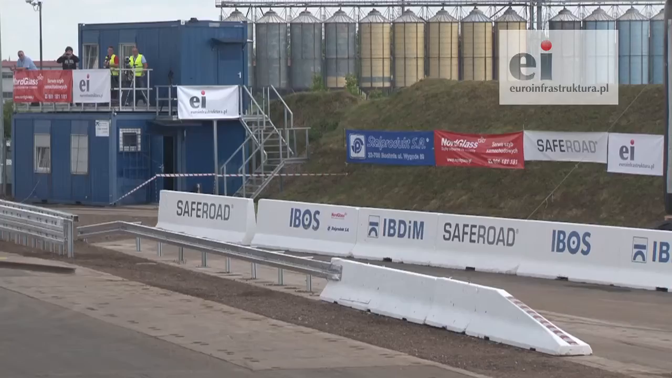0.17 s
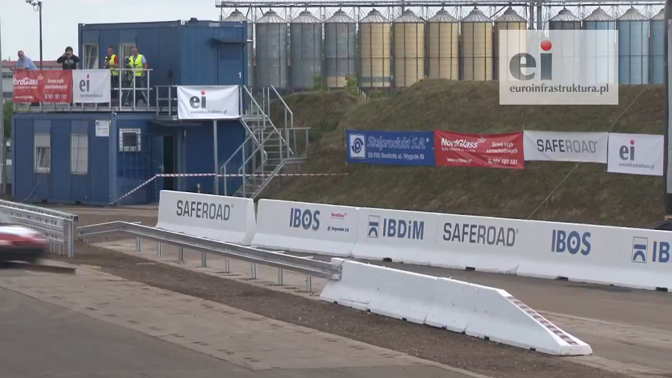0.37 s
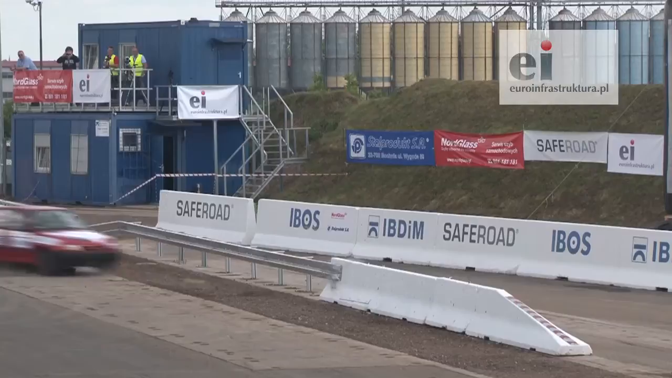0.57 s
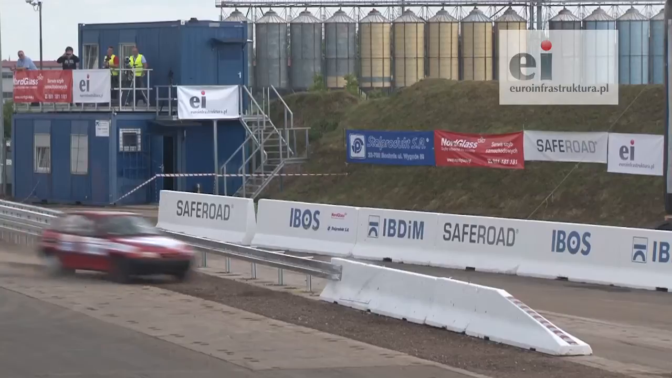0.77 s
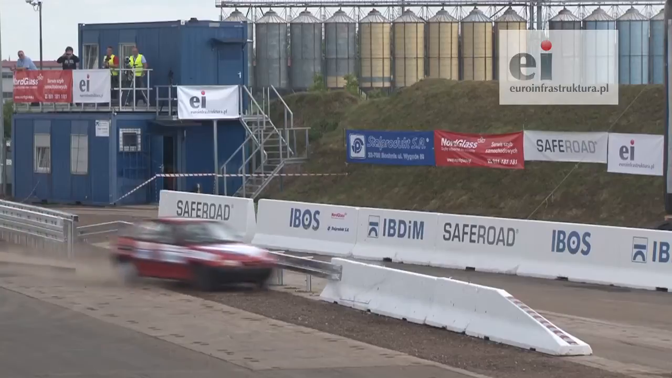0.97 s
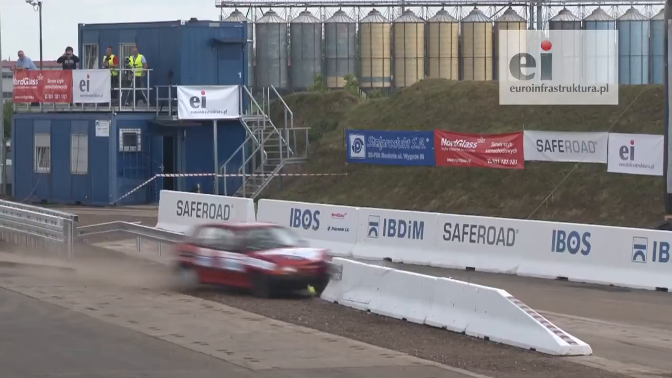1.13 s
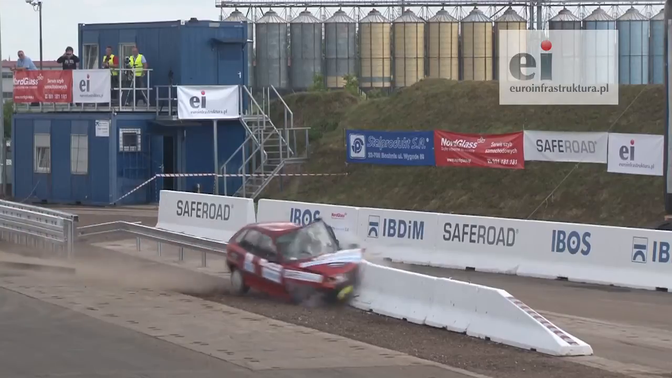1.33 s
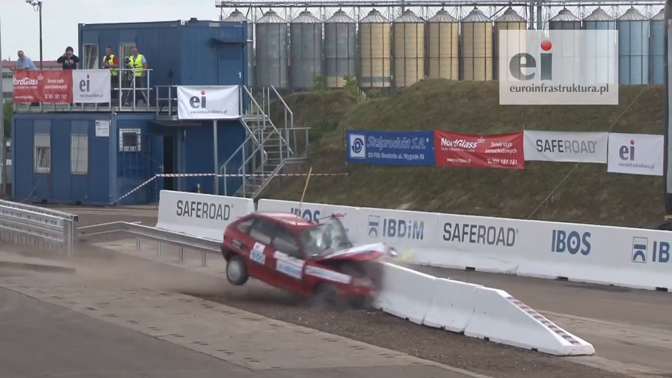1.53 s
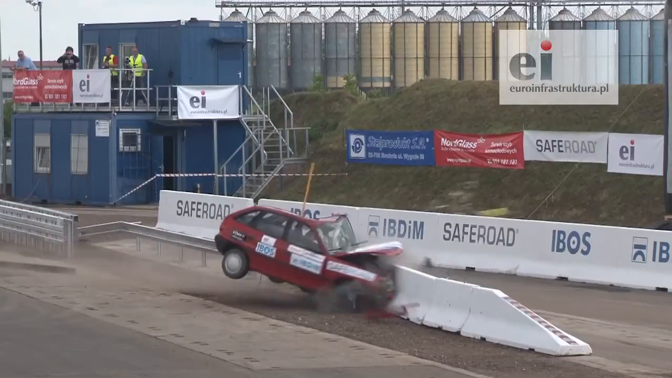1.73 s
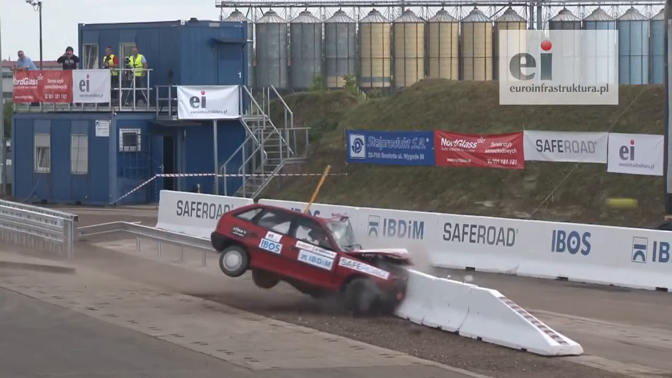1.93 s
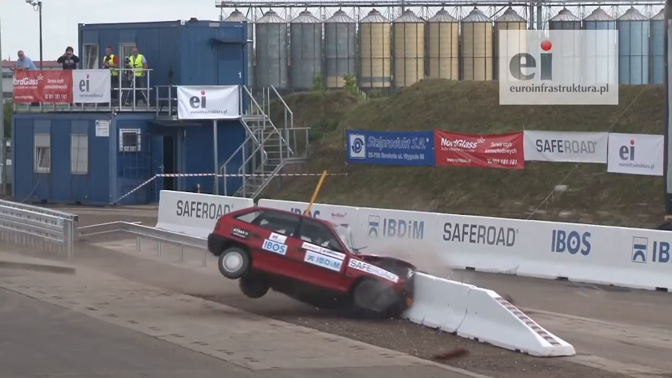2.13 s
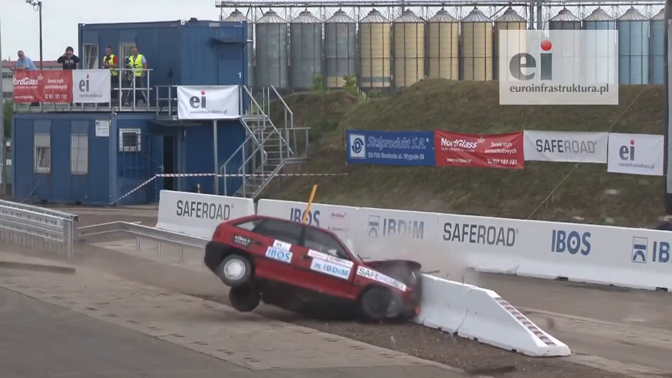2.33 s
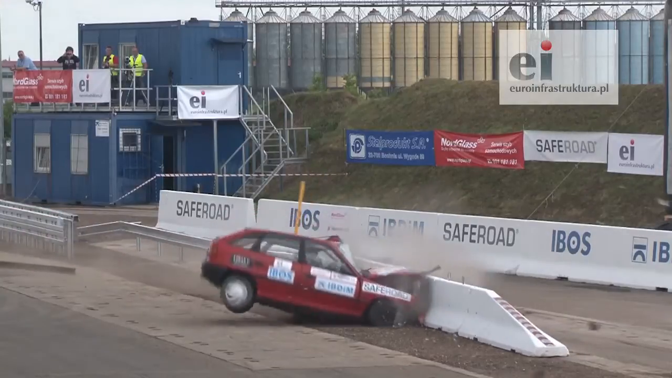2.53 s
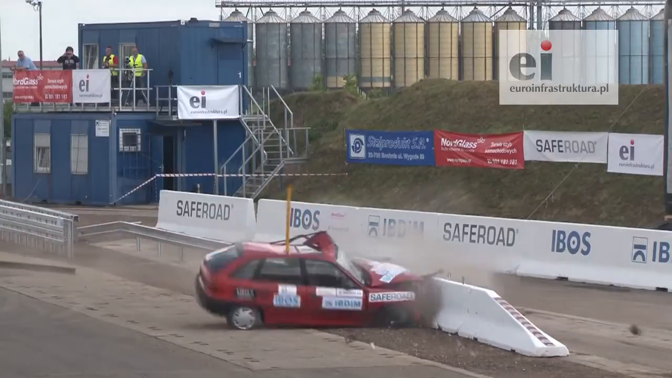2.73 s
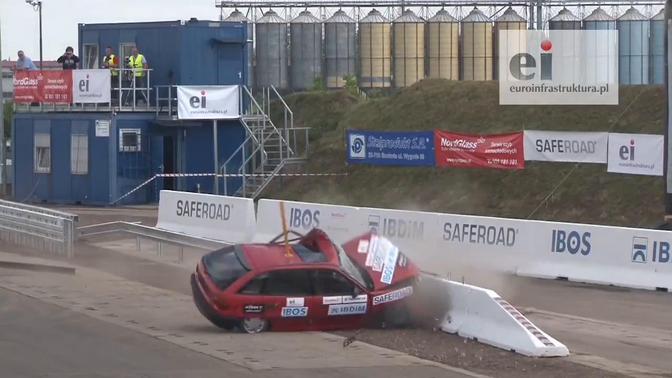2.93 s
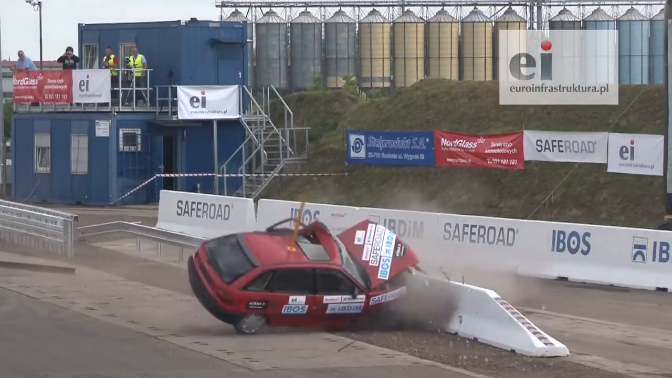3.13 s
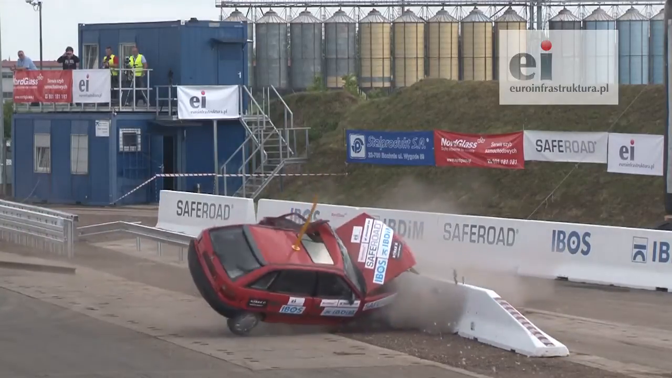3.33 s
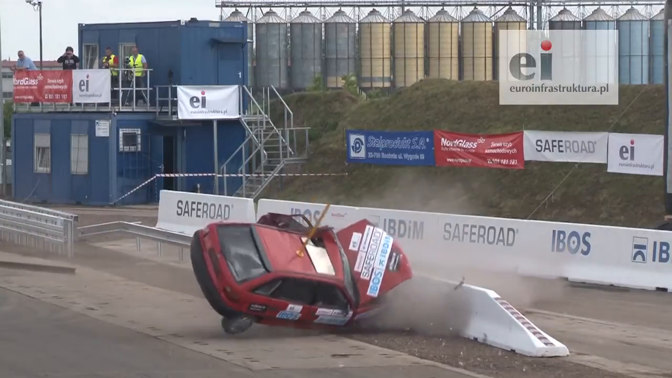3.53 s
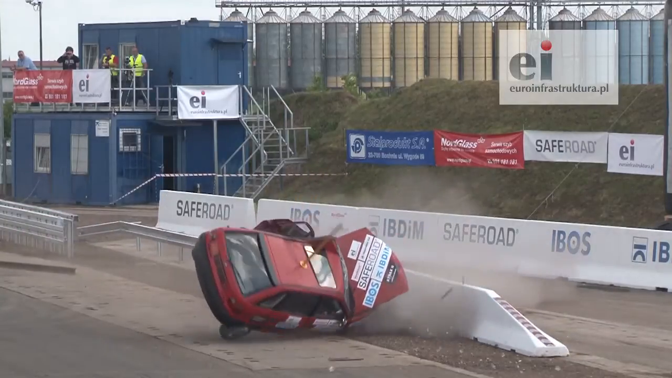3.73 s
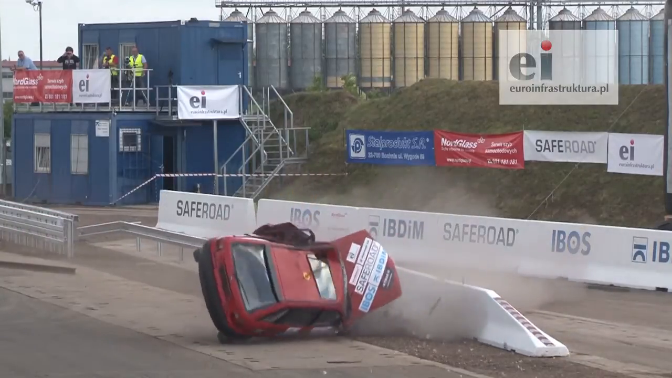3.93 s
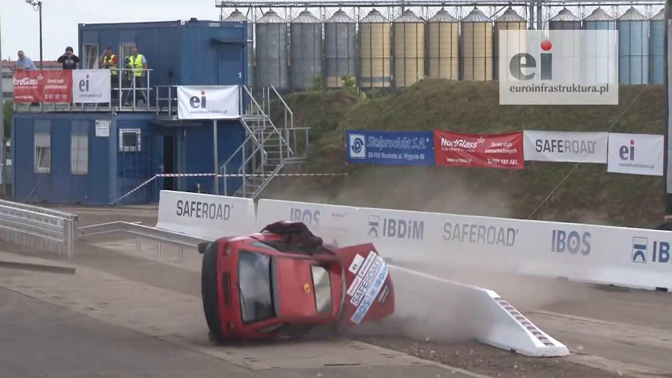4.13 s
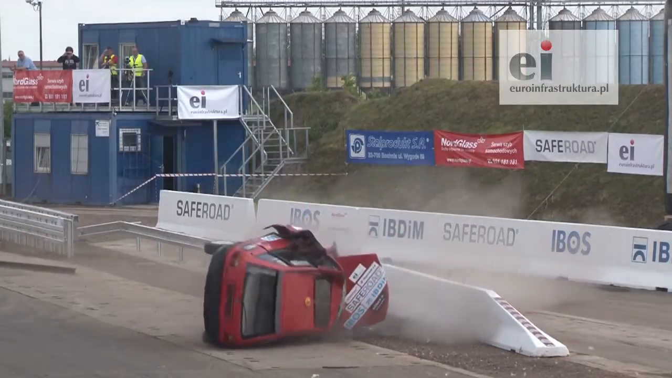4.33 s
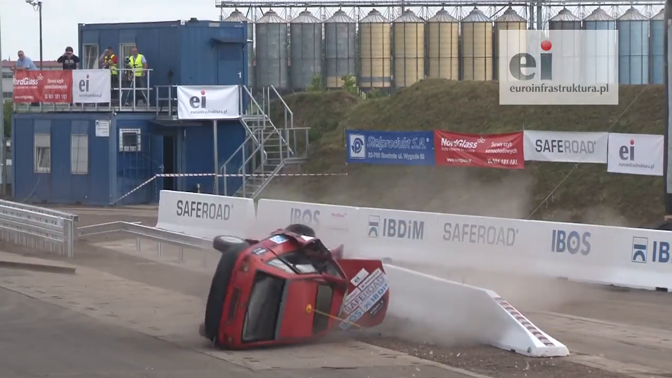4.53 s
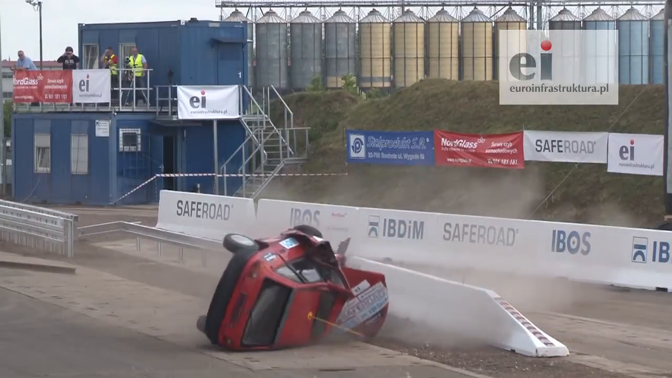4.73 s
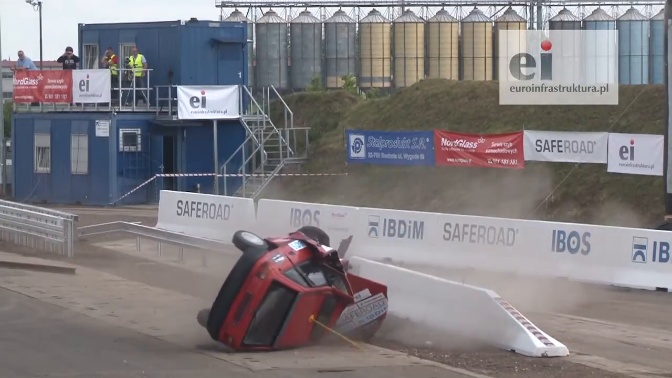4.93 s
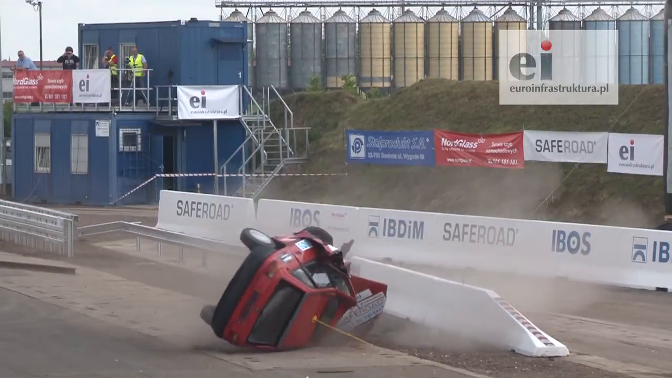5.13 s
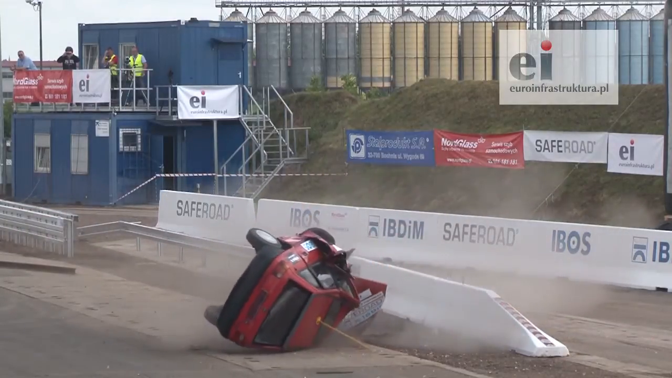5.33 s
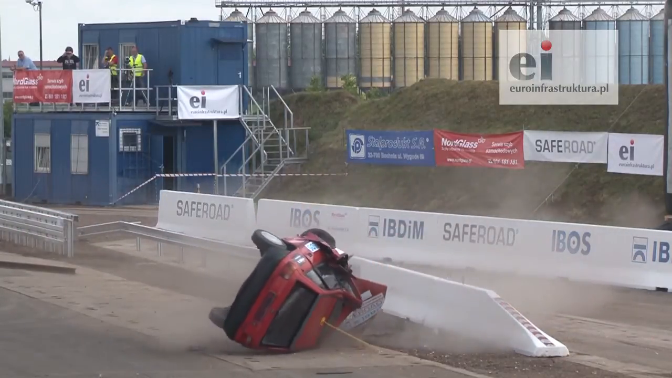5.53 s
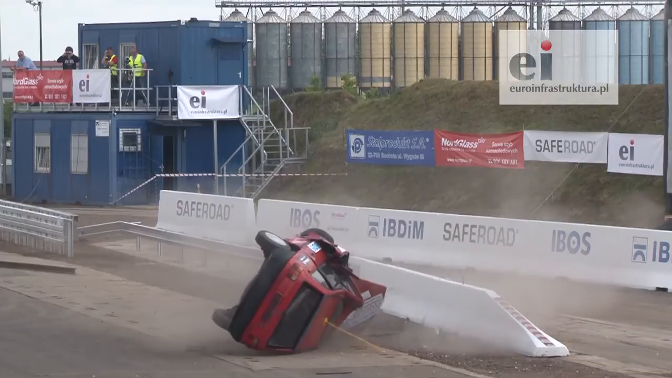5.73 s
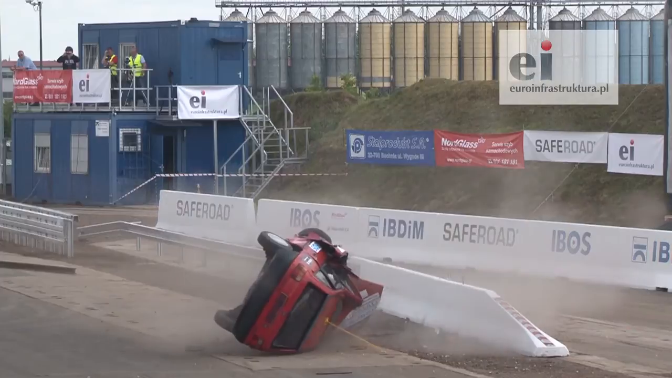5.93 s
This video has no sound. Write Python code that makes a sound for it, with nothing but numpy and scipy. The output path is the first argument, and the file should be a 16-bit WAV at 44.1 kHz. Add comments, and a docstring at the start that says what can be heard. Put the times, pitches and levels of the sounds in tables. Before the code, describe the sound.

After brief silence, gritty tyre roar, a grinding steel rail, then a violent crunching crash, followed by falling debris, folding metal and scattered knocks outdoors.

```python
"""Outdoors, one small microphone some way off: an airy background hiss as tyres roar on a gritty track.
The car's side then grinds on a steel guard rail, rubbed by stick and slip, whose notes hum on.
It slams into a concrete barrier: jagged contacts drive panels, trim and glass, and the frame booms.
Grit and splinters fall as random clicks, pieces knock on the ground; thin squeaks and rings are sines.
The wreck drops and tips on its side, folding and snapping; the hiss swells and a low drone joins it late."""
import sys
import numpy as np
from scipy import signal
from scipy.fft import rfft, irfft
from scipy.io import wavfile

SR = 44100
rng = np.random.default_rng(int(sys.argv[2]) if len(sys.argv) > 2 else 0)


def wrap_up_sound(samples):
    """Save the sound to the file named by the first command line argument, as 16-bit audio."""
    columns = np.atleast_2d(samples).T
    # keep every value between -1 and 1, then stretch to whole-number steps
    tamed = np.clip(columns, -1, 1)
    steps = np.round(tamed * 32767).astype(np.int16)
    wavfile.write(sys.argv[1], SR, steps)


N = 263820
TIME = np.arange(N) / SR   # seconds

# Levels of resonances and spectra are relative within each table.
# airy background hiss, swelling slowly towards the end: (time [s], level [dB])
HISS_LEVEL = [(2.0, -55), (3.2, -52), (4.25, -54), (4.72, -51.5), (4.92, -53.5), (5.55, -49.8),
              (5.98, -50.6)]
# its spectrum: (frequency [Hz], level [dB])
HISS_COLOUR = [(30, -32), (65, -14.5), (130, -12), (200, -16.5), (400, -5.5), (650, -2.5), (1000, -5),
               (1900, -4), (2900, -2.5), (3500, -6.5), (6300, -15.5), (8000, -25), (10000, -34),
               (16000, -72)]
# a low drone comes up late and stays
DRONE_DB, DRONE_FROM_S, DRONE_RISE_DB_PER_S = -77, 4.8, 35

# spectrum of tyres on the track: (frequency [Hz], level [dB])
ROLL_COLOUR = [(24, -29), (40, -26), (122, -10), (177, -22.5), (211, -9.5), (412, -6), (478, -10),
               (582, -1), (1080, -5), (1610, -2), (2060, -9), (2580, -3.5), (3560, -9.5), (6780, -23),
               (15000, -59)]
# tyres roar until the car is stopped
ROLL_DB, ROLL_UNTIL_S, ROLL_FALL_DB_PER_S = -41.2, 1.21, 60

# spectrum of grit and glass: (frequency [Hz], level [dB])
GRIT_COLOUR = [(1500, -30), (3000, 1), (4200, 0.5), (5500, 3), (7000, 4.5), (8300, -2), (9500, 0),
               (10600, -7.5), (12500, -30.5), (16000, -37)]
# grit stirred up by the tyres and by the scraping side, relative to their levels
TYRE_GRIT_DB, SCRAPE_GRIT_DB = -16.5, -14.5
# glass and grit thrown out by the crash:
# (time [s], level [dB], rise [s per 10 dB], fall [s per 10 dB])
SPRAYS = [(1.3, -43, .075, .12), (1.58, -49.5, .15, .45), (2.62, -56, .1, .05), (2.845, -49, .055, .065),
          (3.41, -51, .27, .22), (4.72, -65.5, .25, .2)]
GLASS_BREAKS_S = 1.225
# thrown-up grit keeps coming down, then thins out
SETTLE_FROM_S, SETTLE_UNTIL_S, SETTLE_RISE_DB_PER_S, SETTLE_FALL_DB_PER_S = 1.45, 4.8, 55, 14
PATTER_DB, TRICKLE_DB = -66.7, -63.3

# thin high squeaks and ringing notes: (time [s], frequency [Hz], level [dB], time to fall by 60 dB [s])
THIN_NOTES = [(.38, 8640, -44, .15), (1.49, 8300, -44, .16), (1.561, 7340, -43, .13),
              (2.62, 10970, -33, .038), (2.63, 10500, -43, .052), (2.81, 2250, -35.5, .16),
              (2.92, 10200, -45, .12), (3.045, 6950, -51, .15), (3.07, 7800, -53, .17),
              (3.634, 5430, -56, .18), (3.66, 5410, -42, .15), (4.285, 4350, -48.5, .47),
              (4.28, 7560, -48.5, .16)]

# what the rail sings with when rubbed: (frequency [Hz], width [Hz], level [dB])
RAIL_MODES = [(560, 320, -3), (834, 130, 2), (1118, 105, 4.5), (1530, 110, -23), (2460, 240, -27),
              (3030, 430, -2.5), (4150, 410, -9), (5450, 1500, -20), (6430, 1100, -15)]
# long bending notes of the struck rail: (frequency [Hz], level [dB])
RAIL_NOTES = [(183, -73.5), (231.5, -67.5), (387.6, -68.5)]
# the rail swings while the car leans on it, then dies away
SWING_FROM_S, SWING_UNTIL_S, SWING_RISE_DB_PER_S, SWING_FALL_DB_PER_S = .7, 3.08, 15, 48
# the car's side grinds along the rail from first touch to the barrier
SCRAPE_DB, SCRAPE_FROM_S, SCRAPE_UNTIL_S, SCRAPE_EDGE_DB_PER_S = -41.7, .78, 1.23, 500
# the car catching on rail joints: (time [s], length [s], level [dB])
CATCHES = [(0.826, 0.024, -32.3), (0.951, 0.019, -38), (1.061, .006, -32.3), (1.099, 0.013, -41.5)]
# screech of a joint: (frequency [Hz], width [Hz], level [dB])
JOINT_MODES = [(2590, 260, -2), (3100, 260, 3), (3940, 340, -2), (5340, 1140, -13.5), (6660, 1040, -14.5)]
# the side presses harder after a catch: level relative to it, lag, time to rise and to fall by 10 dB
PRESS_DB, PRESS_LAG_S, PRESS_RISE_S, PRESS_FALL_S = -4.8, .042, .035, .12
FULL_CATCH_S = .024   # shorter catches pass on less energy

# heavy blows, each a short run of buckles:
# (time [s], length [s], level of the trim [dB], hardness [dB]: more glass and less panel)
BLOWS = [(1.223, .0076, -30, 2), (1.254, .018, -39, 2.5), (1.281, .0057, -33, -3),
         (1.301, .0095, -36, -7.5), (1.315, .011, -41.5, -12), (1.333, .0075, -36, -3),
         (1.352, .014, -43.5, 2.5), (1.381, .027, -47, -5), (1.868, .011, -49.5, -7),
         (2.097, .008, -49, -8), (2.109, .011, -42, -8), (2.124, .02, -50, -9), (2.502, .011, -54, -10),
         (2.732, .02, -53, -10.5), (2.768, .012, -45.5, -5), (2.806, .011, -41, -2),
         (2.832, .0059, -37.5, 0), (2.852, .043, -51, 0), (3.395, .035, -59, 0), (3.719, .005, -51, 4),
         (3.95, .022, -52, 0)]
BLOW_PANEL_DB, BLOW_CHIP_DB = -3.5, -4.5   # relative to the trim, before hardness
# brittle trim giving way under the wreck's weight: (time [s], length [s], level [dB])
SNAPS = [(2.198, .0026, -36.5), (2.21, .006, -44.5), (4.476, .003, -43.3), (5.146, .064, -51),
         (5.209, .0072, -43), (5.541, .01, -48.5)]
SNAP_PANEL_DB, SNAP_CHIP_DB = -11, -15   # relative to the trim
# sheet steel of the body: (frequency [Hz], width [Hz], level [dB])
PANEL_MODES = [(216, 90, -12.5), (412, 170, -5), (581, 140, 2), (720, 53, 3.5), (810, 76, 2.5),
               (984, 310, -1.5), (1330, 160, -5)]
# snapping trim and brackets: (frequency [Hz], width [Hz], level [dB])
CRACK_MODES = [(1560, 270, -3), (2290, 233, 4.5), (2524, 310, 2), (3086, 270, 0.5), (3860, 390, -2.5)]
# shattering glass and chips: (frequency [Hz], width [Hz], level [dB])
CHIP_MODES = [(3970, 540, -5), (5830, 2100, 3), (6430, 1670, 4), (7120, 300, 2), (8300, 420, -5.5),
              (9900, 1200, -11), (13500, 3000, -61)]

# spectrum of folding sheet metal: (frequency [Hz], level [dB])
PANEL_COLOUR = [(40, -30), (90, -21), (160, -8.5), (330, -4.5), (500, -2), (700, 2), (1000, -1.5),
                (1400, -2), (1900, -8), (2600, -10.5), (4000, -11), (7000, -18), (10000, -25), (16000, -47)]
# the shell folds under the car's weight, at the impact and at each landing:
# (time [s], level [dB], rise [s per 10 dB], fall [s per 10 dB])
FOLDS = [(1.245, -36.7, .014, .19), (1.9, -51, .07, .4), (2.57, -50.5, .12, .14), (2.83, -44.5, .15, .07),
         (3.04, -48.5, .07, .08), (3.93, -57.5, .2, .1)]
# the wreck drags along the barrier, then dies away
DRAG_DB, DRAG_FROM_S, DRAG_UNTIL_S, DRAG_RISE_DB_PER_S, DRAG_FALL_DB_PER_S = -55, 1.25, 3.2, 600, 16
# boom of the frame: (frequency [Hz], width [Hz], level [dB])
FRAME_MODES = [(89, 38, -9), (157, 61, -1), (232.8, 63, 3.5), (406, 170, 1)]
# the frame takes the load of the impact
FRAME_DB, FRAME_FROM_S, FRAME_UNTIL_S, FRAME_RISE_DB_PER_S, FRAME_FALL_DB_PER_S = -44, 1.235, 1.3, 1000, 66

# the first and thickest fall of grit: (time [s], level [dB], rise [s per 10 dB], fall [s per 10 dB])
FIRST_FALL = (1.55, -55, .17, .35)
# spectrum of the falling ticks: (frequency [Hz], level [dB])
TICK_COLOUR = [(1500, -5), (4000, 12.5), (7000, 0), (9500, 8.5), (11500, -13.5), (16000, -19)]

# single pieces knocking on the ground: (time [s], level [dB], brightness [dB]: chip over crack)
KNOCKS = [(1.755, -36.5, 1), (2.341, -39, 5), (2.451, -38, -6), (2.492, -40, 1), (2.544, -41, -12),
          (2.684, -38.5, -1), (3.288, -43, 14), (3.394, -37.5, 18), (3.4, -40.5, 17), (3.407, -36.5, 16),
          (3.428, -41.5, 18), (3.547, -41, 16), (3.765, -32.5, 3), (3.848, -39, -1), (4.0056, -32.5, 2),
          (4.042, -32.5, 6), (4.285, -43, 12), (4.413, -40.5, 0), (4.516, -42, -5), (5.17, -43.5, -9),
          (5.498, -41, 4)]

# echoes from the wall, the cabins and the bank, before dulling: (delay [s], level [dB])
ECHOES = [(.021, -19), (.058, -24.5), (.13, -25)]
# dips of the microphone housing: (frequency [Hz], width [Hz], level [dB])
HOUSING_DIPS = [(3470, 700, -7.5), (4684, 420, -4), (9570, 2670, -13.5)]
TREBLE_HZ, CUTOFF_HZ = 15000, 15800   # the microphone dulls above the first, the top is cut at the second
START_S = .304   # silent before this


def from_db(db):
    """Decibels to gain."""
    return 10 ** (np.asarray(db) / 20)


def rms_one(x):
    """Scale to an rms of 1."""
    return x / np.sqrt(np.mean(x ** 2) + 1e-20)


def low_pass(x, hz, order=2):
    """Roll off the treble above a frequency."""
    return signal.sosfilt(signal.butter(order, hz, fs=SR, output="sos"), x)


def drift(rate):
    """Smooth chance with an rms of 1, renewed rate times a second."""
    return rms_one(np.interp(TIME * rate, np.arange(4096), rng.standard_normal(4096)))


def through(x, response):
    """Pass a signal through an impulse response."""
    return signal.oaconvolve(x, response)[:N]


def peak(x, hz, width):
    """One resonance with a gain of 1 on top."""
    return signal.lfilter(*signal.iirpeak(min(hz, .45 * SR), hz / width, fs=SR), x)


def colour(points, size=4096):
    """Causal (minimum-phase) impulse response of unit energy with the given spectrum."""
    hz, db = np.transpose(points)
    grid = np.maximum(np.arange(size // 2 + 1) * SR / size, 1)
    spectrum = from_db(np.interp(np.log(grid), np.log(hz), db))
    cepstrum = irfft(np.log(spectrum))
    # folding the cepstrum forward makes the response causal
    cepstrum[1:size // 2] *= 2
    cepstrum[size // 2 + 1:] = 0
    return rms_one(irfft(np.exp(rfft(cepstrum)))) / np.sqrt(size)


def body(modes, scatter=0.0, size=4096):
    """Impulse response of damped modes, unit energy; scatter detunes them as each piece differs."""
    click = signal.unit_impulse(size) + 1e-18
    response = np.zeros(size)
    for k, (hz, width, db) in enumerate(modes):
        tuned_hz = hz * np.exp(scatter * rng.normal())
        response += (-1) ** k * from_db(db) * peak(click, tuned_hz, width)
    # little radiates far above the highest mode
    response = low_pass(response, min(2 * modes[-1][0], SR / 2.2))
    return rms_one(response) / np.sqrt(size)


def grains(per_s, spread_db):
    """Random clicks of uneven size, rms 1."""
    sizes = from_db(spread_db * np.minimum(rng.exponential(1, N), 4))
    signed = sizes * rng.choice([-1, 1], N)
    return rms_one(signed * (rng.random(N) < per_s / SR))


def add(out, s, sound):
    """Mix a sound in at time s."""
    at = int(s * SR)
    out[at:at + len(sound)] += sound[:N - at]


def held(from_s, until_s, rise_db_per_s, fall_db_per_s):
    """Gain that rises to 1, holds between two times and dies away."""
    before = rise_db_per_s * np.maximum(from_s - TIME, 0)
    after = fall_db_per_s * np.maximum(TIME - until_s, 0)
    return from_db(-np.clip(before + after, 0, 200))


def surge(s, db, rise_s, fall_s):
    """Gain that swells to a peak and fades, by 10 dB in each rise or fall time."""
    return from_db(db) * held(s, s, 10 / rise_s, 10 / fall_s)


def together(*gains):
    """Unrelated causes add in power."""
    return np.sqrt(sum(gain ** 2 for gain in gains))


def contact(length, modes, rise_s=0.00084, fade_s=0.0062, jag_db=2.8, size=8192):
    """A jagged force drives a body while the contact lasts; the sound has the energy of the force's envelope."""
    t = TIME[:size]
    force = (1 - np.exp(-t / rise_s)) * np.exp(-np.maximum(t - length, 0) / fade_s)
    buckles = force * rng.standard_normal(size) * from_db(jag_db * drift(506)[:size])
    sound = signal.fftconvolve(buckles, body(modes, scatter=0.045))
    return sound * np.linalg.norm(force) / np.linalg.norm(sound)


def background(tone_hz=1530, tone_width_hz=230, tone_db=2.5, surge_db=2.0, drone_hz=70):
    """Coloured noise as an airy hiss with a surging resonance, and a low wandering sine that comes up late."""
    air = through(rng.standard_normal(N), colour(HISS_COLOUR))
    hiss = air + from_db(tone_db + surge_db * drift(15)) * peak(air, tone_hz, tone_width_hz)
    level_db = np.interp(TIME, *np.transpose(HISS_LEVEL)) + 0.3 * drift(25)
    drone_gain = from_db(DRONE_DB) * held(DRONE_FROM_S, N / SR, DRONE_RISE_DB_PER_S, 0)
    drone = drone_gain * np.sin(2 * np.pi * drone_hz * TIME + 0.9 * drift(16))
    return hiss * from_db(level_db) + drone


def rolling():
    """Strength of the tyres: steady at speed, fading once the car is stopped."""
    return from_db(ROLL_DB) * held(0, ROLL_UNTIL_S, 0, ROLL_FALL_DB_PER_S)


def tyres():
    """Tread blocks slap the gritty track so densely that they merge into a roar."""
    slaps = grains(per_s=15000, spread_db=0.5) * from_db(0.47 * drift(41))
    return through(slaps * rolling(), colour(ROLL_COLOUR))


def rubbing():
    """Pressure of the car's side on the rail: steady, and harder after each catch."""
    presses = []
    for s, length, db in CATCHES:
        press = surge(s + PRESS_LAG_S, db + PRESS_DB, PRESS_RISE_S, PRESS_FALL_S)
        presses.append(press * np.sqrt(length / FULL_CATCH_S))
    touching = held(SCRAPE_FROM_S, SCRAPE_UNTIL_S, SCRAPE_EDGE_DB_PER_S, SCRAPE_EDGE_DB_PER_S)
    return together(from_db(SCRAPE_DB), *presses) * touching


def settling():
    """Share of the airborne grit that is coming down."""
    return held(SETTLE_FROM_S, SETTLE_UNTIL_S, SETTLE_RISE_DB_PER_S, SETTLE_FALL_DB_PER_S)


def debris(tinkle_width_hz=80, count=22):
    """Grit patters on the ground; a few glass splinters tinkle in it, each at its own pitch."""
    stirred = together(from_db(TYRE_GRIT_DB) * rolling(), from_db(SCRAPE_GRIT_DB) * rubbing())
    thrown = [surge(*spray) for spray in SPRAYS]
    gain = together(stirred, from_db(PATTER_DB) * settling(), *thrown)
    patter = grains(per_s=3200, spread_db=2.0) * gain
    shards = from_db(-10) * gain * (TIME > GLASS_BREAKS_S)
    tinkle = np.zeros(N)
    for hz in np.geomspace(5000, 13500, count):
        splinter = body([(hz, tinkle_width_hz, 0)], scatter=0.0327)
        tinkle += through(grains(per_s=14, spread_db=6.5) * shards, splinter)
    return through(patter + tinkle / np.sqrt(count), colour(GRIT_COLOUR))


def thin_notes(swell_s=0.0086, waver_hz=14, waver_depth=0.1):
    """Thin high squeaks and ringing notes: sines that swell, waver and fade."""
    out, t = np.zeros(N), TIME[:SR // 2]
    swell = (1 - np.exp(-t / swell_s)) * (1 - waver_depth * np.cos(2 * np.pi * waver_hz * t))
    for s, hz, db, t60 in THIN_NOTES:
        decay = np.exp(-np.log(1000) * t / t60)
        add(out, s, from_db(db) * swell * decay * np.sin(2 * np.pi * hz * t))
    return out


def rail():
    """Stick and slip excite the rail, its joints screech as the car catches them, its long spans hum on."""
    slips = grains(per_s=5000, spread_db=1.5) * from_db(0.99 * drift(70.9))
    out = through(slips * rubbing(), body(RAIL_MODES))
    for s, length, db in CATCHES:
        add(out, s, from_db(db) * contact(length, JOINT_MODES))
    swing = held(SWING_FROM_S, SWING_UNTIL_S, SWING_RISE_DB_PER_S, SWING_FALL_DB_PER_S)
    for hz, db in RAIL_NOTES:
        strength = np.sqrt(2) * from_db(2 * drift(6))
        note = strength * np.sin(2 * np.pi * hz * TIME + .4 * drift(5))
        out += from_db(db) * swing * note
    return out


def crunch(length, panel_db, chip_db):
    """One contact that cracks trim, with its shares of panel and glass."""
    trim = contact(length, CRACK_MODES)
    panel = from_db(panel_db) * contact(length, PANEL_MODES)
    glass = from_db(chip_db) * contact(length, CHIP_MODES)
    return trim + panel + glass


def blows():
    """Blows buckle panels, snap trim and shatter glass, brighter when harder; trim also snaps by itself."""
    out = np.zeros(N)
    for s, length, db, hardness in BLOWS:
        add(out, s, from_db(db) * crunch(length, BLOW_PANEL_DB - hardness, BLOW_CHIP_DB + hardness))
    for s, length, db in SNAPS:
        add(out, s, from_db(db) * crunch(length, SNAP_PANEL_DB, SNAP_CHIP_DB))
    return out


def crumpling():
    """Sheet metal drags and folds in clumps of small snaps; the frame booms as it takes the full load."""
    drag = from_db(DRAG_DB) * held(DRAG_FROM_S, DRAG_UNTIL_S, DRAG_RISE_DB_PER_S, DRAG_FALL_DB_PER_S)
    crush = together(drag, *(surge(*fold) for fold in FOLDS))
    snaps = grains(per_s=2600, spread_db=1.0) * from_db(1.56 * drift(80))
    sheet = through(snaps * crush, colour(PANEL_COLOUR))
    load = from_db(FRAME_DB) * held(FRAME_FROM_S, FRAME_UNTIL_S, FRAME_RISE_DB_PER_S, FRAME_FALL_DB_PER_S)
    boom = through(grains(per_s=1500, spread_db=3.0) * load, body(FRAME_MODES))
    return sheet + boom


def trickle(skip_s=0.0011, size=512):
    """Thrown-up grit comes down in small bright ticks that each skip on the ground in their own way."""
    falling = together(from_db(TRICKLE_DB) * settling(), surge(*FIRST_FALL))
    ticks = grains(per_s=160, spread_db=3.0) * falling
    # spread the power of each tick over its skips, then fill it with noise
    skip = np.exp(-2 * TIME[:size] / skip_s)
    power = np.abs(through(ticks ** 2, skip / skip.sum()))
    skipping = np.sqrt(power) * rng.standard_normal(N)
    return through(skipping, colour(TICK_COLOUR))


def knocks(rattle_db=-19, rattle_s=0.0032, softness_hz=9000, size=2048):
    """A piece lands with one sharp click and a brief rattle."""
    out = np.zeros(N)
    for s, level_db, brightness in KNOCKS:
        crack = (CRACK_MODES, level_db - brightness / 2)
        chip = (CHIP_MODES, level_db + brightness / 2)
        for modes, db in (crack, chip):
            touch = from_db(rattle_db) * rng.standard_normal(size) * np.exp(-TIME[:size] / rattle_s)
            touch[0] = 1   # the click
            sound = signal.fftconvolve(touch, body(modes, scatter=0.041))
            add(out, s, from_db(db) * sound / np.abs(sound).max())
    return low_pass(out, softness_hz)


def yard(x, wall_hz=3000, tail_db=-17, tail_t60=0.25):
    """The direct sound with dull echoes off the walls and a thin scattered tail."""
    scatter = rng.standard_normal(SR) * np.exp(-np.log(1000) * TIME[:SR] / tail_t60)
    response = from_db(tail_db) * rms_one(scatter) / np.sqrt(SR)
    for s, db in ECHOES:
        response[int(s * SR)] += from_db(db)
    return x + low_pass(through(x, response), wall_hz, order=1)


def scene():
    """The crash echoing in the open yard, with tyres and background heard without echoes."""
    crash = debris() + thin_notes() + rail() + blows() + crumpling() + trickle() + knocks()
    return (background() + tyres() + yard(crash))[None]


def record(dry):
    """The housing notches the treble, the bass is rolled off, the sound switches on, the top is cut."""
    for hz, width, db in HOUSING_DIPS:
        dry = dry + (from_db(db) - 1) * peak(dry, hz, width)
    dulled = low_pass(dry, min(TREBLE_HZ, .45 * SR))
    thinned = signal.sosfilt(signal.butter(3, 44, "high", fs=SR, output="sos"), dulled)
    switched = thinned * (TIME >= START_S)
    return signal.sosfilt(signal.ellip(12, .1, 80, CUTOFF_HZ, fs=SR, output="sos"), switched)


dry = scene()
out = record(dry)
wrap_up_sound(out)
```